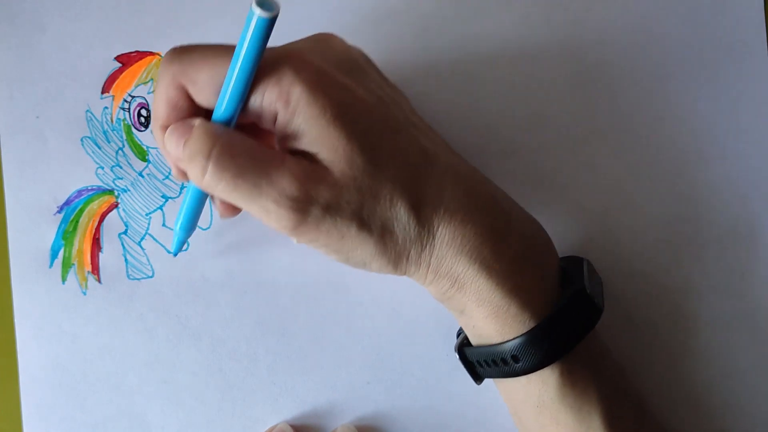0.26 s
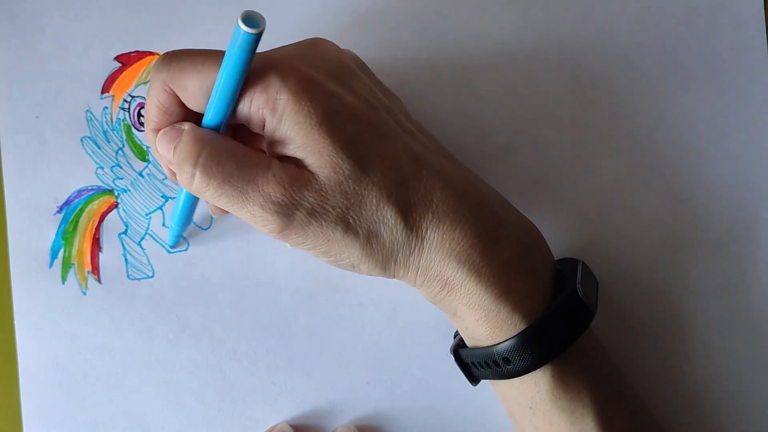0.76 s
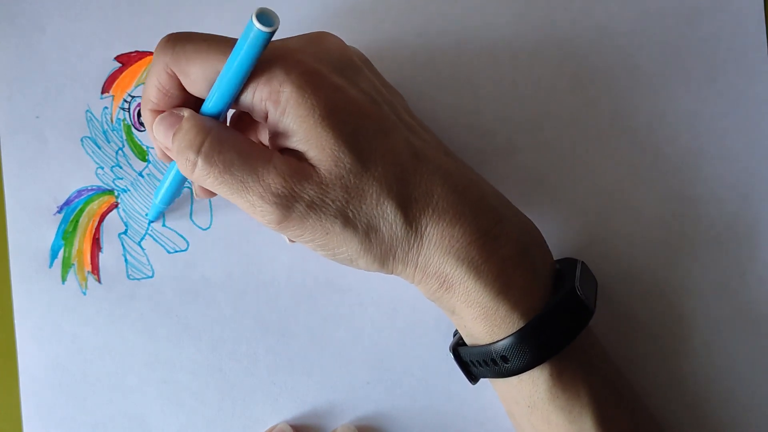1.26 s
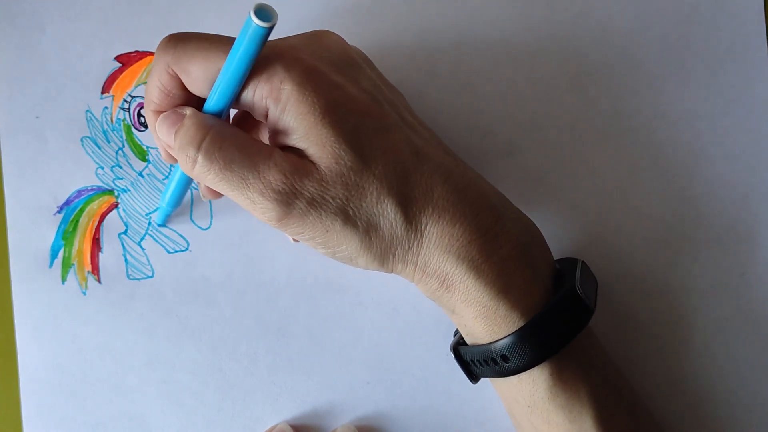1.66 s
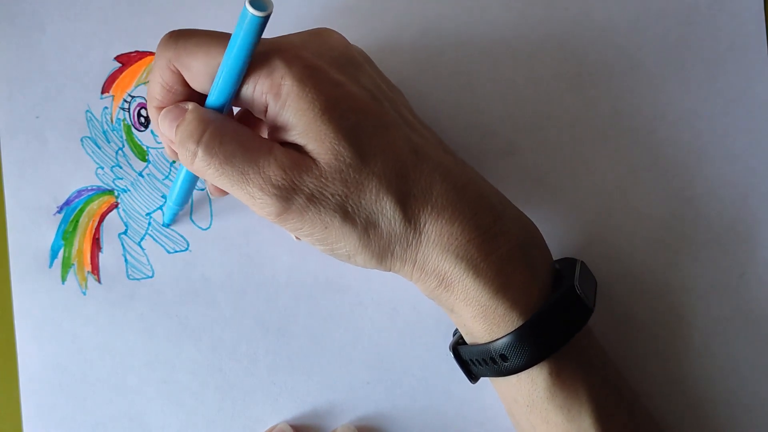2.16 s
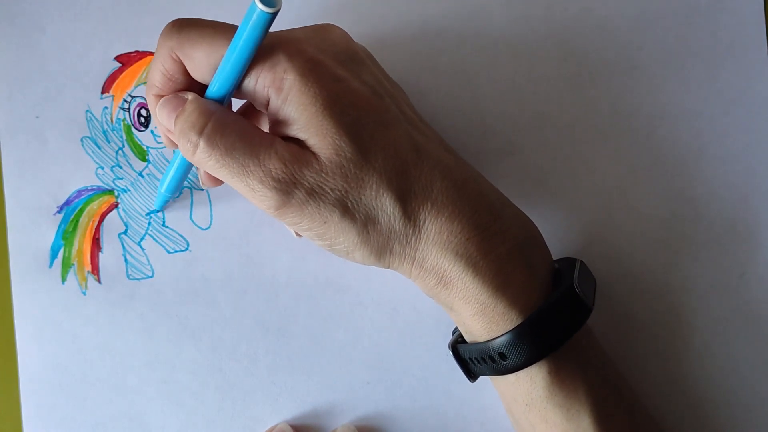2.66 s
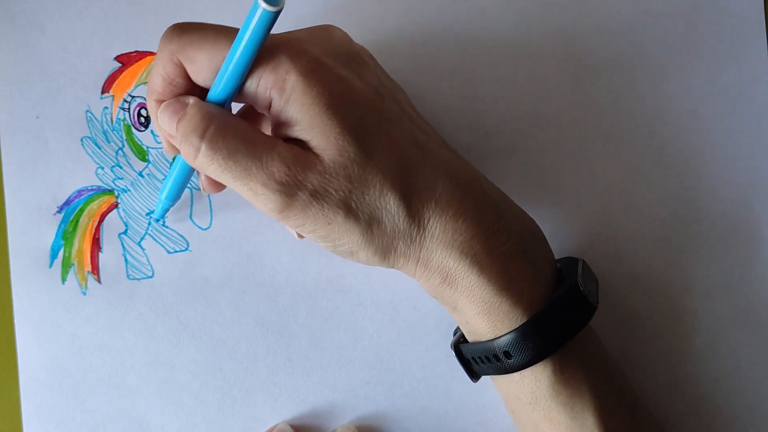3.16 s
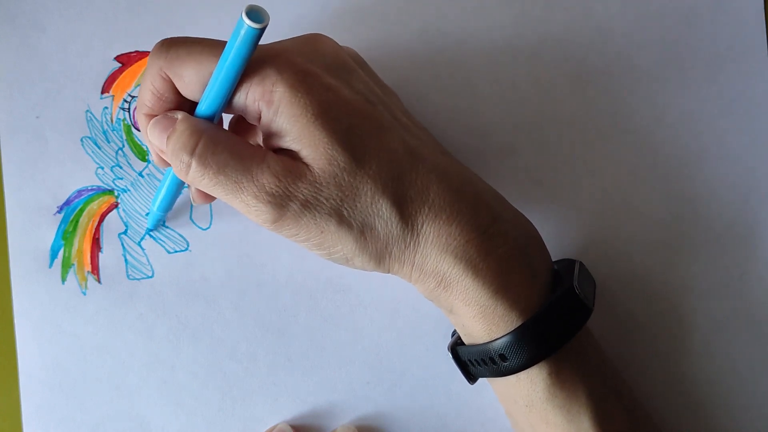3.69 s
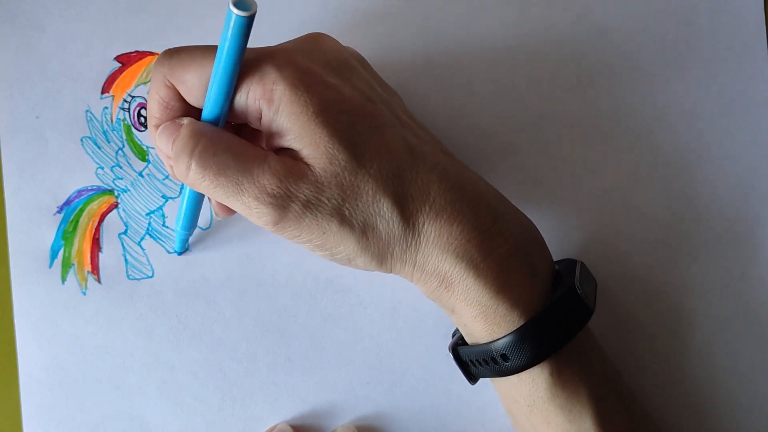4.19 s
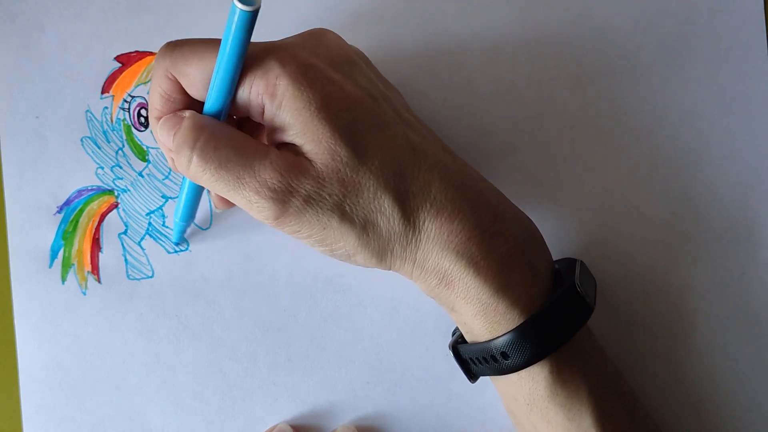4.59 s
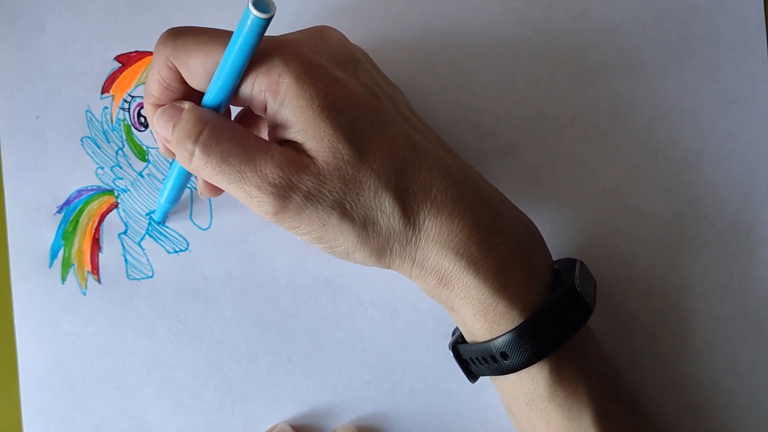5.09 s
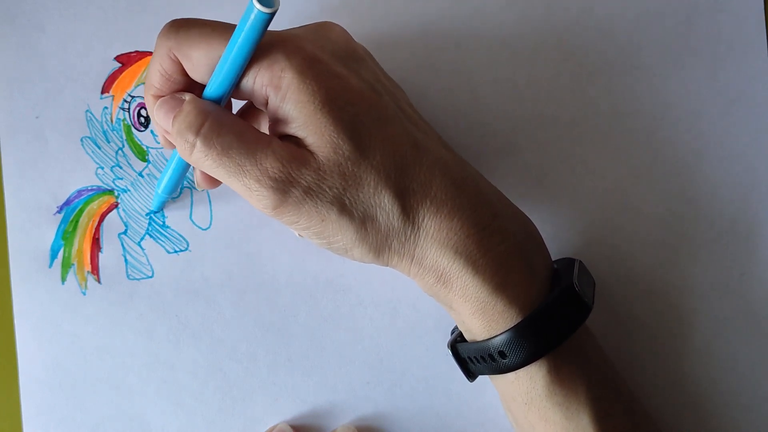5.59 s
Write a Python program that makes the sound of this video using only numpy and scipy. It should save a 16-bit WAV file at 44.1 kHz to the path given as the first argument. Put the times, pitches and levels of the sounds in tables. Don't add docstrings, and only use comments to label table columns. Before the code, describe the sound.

A felt-tip pen scratches short dry colouring strokes on paper in a quiet room, after a faint motor buzz and a hand slide.

```python
import sys
import numpy as np
from scipy import signal
from scipy.fft import rfft, irfft
from scipy.io import wavfile

SR = 44100
rng = np.random.default_rng(int(sys.argv[2]) if len(sys.argv) > 2 else 0)


def voltage_ratio(decibels):
    exponent = np.asarray(decibels, float) / 20
    return 10 ** exponent


def materialize(psi):
    bounded = np.clip(np.atleast_2d(psi).T, -1, 1)
    quanta = np.round(bounded * 32767).astype(np.int16)
    wavfile.write(sys.argv[1], SR, quanta)


N = 257544
T = np.arange(N) / SR
HZ = np.fft.rfftfreq(N, 1 / SR)


def evened(x):
    return x / np.sqrt(np.mean(x ** 2) + 1e-20)


def coloured(points):
    f, db = np.transpose(points)
    gain_db = np.interp(np.log(HZ + 1), np.log(f + 1), db)
    return evened(irfft(rfft(rng.standard_normal(N)) * voltage_ratio(gain_db), N))


def drift(hz):
    return evened(irfft(rfft(rng.standard_normal(N)) * np.exp(-(HZ / hz) ** 2), N))


def rung(x, modes):
    gain = 0
    for k, (f, width, db) in enumerate(modes):
        damping = 1j * HZ * width
        gain = gain + (-1) ** k * voltage_ratio(db) * damping / (f ** 2 - HZ ** 2 + damping)
    return irfft(rfft(x) * gain / np.sqrt(np.mean(abs(gain) ** 2)), N)


def felt_slips():
    slips_per_s, size_spread_db, grip_flutter_db = 10000, 2.8, 1.2
    size = voltage_ratio(size_spread_db * np.minimum(rng.exponential(1, N), 5))
    size *= rng.choice([-1., 1.], N)
    fires = rng.random(N) < slips_per_s / SR
    return evened(size * fires * voltage_ratio(grip_flutter_db * drift(170)))


def stroke_pressure():
    # (start [s], press-down [s], lift-off [s], barrel level [dB], desk share [dB])
    strokes = [(0.79, .03, 0.089, -64, -2), (1.085, 0.08, 0.056, -65.5, -1.5),
               (1.235, 0.022, .035, -75.5, -12), (1.39, 0.055, 0.07, -63, -1),
               (1.725, 0.06, 0.057, -63.5, -2), (2.185, 0.0078, 0.059, -59.5, -2),
               (2.41, 0.044, 0.027, -68.5, 2), (2.59, .05, .04, -77.5, 5), (2.8, .014, 0.044, -78, 2),
               (2.984, 0.013, 0.055, -73, 5), (3.6, 0.028, 0.056, -76, 6.5), (3.87, 0.036, 0.037, -73.5, 1),
               (4.18, 0.041, 0.072, -71, -4), (4.53, 0.055, 0.06, -71, 3), (4.864, 0.018, 0.1, -65, -2.5),
               (5.175, 0.043, 0.028, -68.5, 0.5), (5.49, 0.042, .03, -80, -5)]
    # (loose shell share [dB], nib tilt as tip share [dB])
    grips = [(-4.5, -2), (-8, 1), (-11, 2), (-11, -0.5), (-11, -1), (-13, -2), (-13, 1), (-4, -1), (-6, -4),
             (-3, 0.5), (-8, -2), (-10, -2), (-9, 0), (-12, -1), (-15, -3), (-8, -1), (-8, -1)]
    # (time [s], half length [s], level [dB])
    grazes = [
        (4.265, 0.024, -77),
        (4.326, 0.016, -74),
        (5.245, .012, -70),
        (5.52, .03, -83),
    ]
    land_db, land_curve, lift_db, lift_curve = -21, 2.8, -28, 1.85
    desk_follows = .7
    desk_gains_db, tip_gains_db = 1, 3
    tip_db, tip_lag_s = -1, 0.0034

    barrel, shell, desk, tip = np.zeros((4, N))
    for (start_s, down_s, lift_s, press_db, desk_db), (loose_db, tilt_db) in zip(strokes, grips):
        on = (T >= start_s) & (T < start_s + down_s + lift_s)
        past_s = T[on] - start_s - down_s
        under_db = land_db * np.clip(-past_s / down_s, 0, 1) ** land_curve
        under_db += lift_db * np.clip(past_s / lift_s, 0, 1) ** lift_curve
        along = np.where(past_s < 0, past_s / down_s, past_s / lift_s)
        edge = signal.windows.tukey(on.sum(), .1)
        barrel[on] += voltage_ratio(press_db + under_db) * edge
        shell[on] += voltage_ratio(press_db + under_db + loose_db) * edge
        desk[on] += voltage_ratio(press_db + desk_db + desk_follows * under_db + desk_gains_db * along) * edge
        tip[on] += voltage_ratio(press_db + under_db + tip_db + tilt_db + tip_gains_db * along) * edge
    tip = np.roll(tip, round(tip_lag_s * SR))
    for time_s, half_s, graze_db in grazes:
        tip += voltage_ratio(graze_db) * np.exp(-((T - time_s) / half_s) ** 2)
    return barrel, shell, desk, tip


def pen():
    # (frequency [Hz], width [Hz], level [dB])
    desk_modes = [(392, 123, 4), (1010, 200, -1.5), (1273, 100, 3.5), (1514, 205, 5), (1700, 225, 5),
                  (2000, 170, 4), (2476, 450, 0.5)]
    # (frequency [Hz], width [Hz], level [dB])
    barrel_modes = [(4404, 155, 0.5), (4770, 230, 6), (5030, 760, -2.5), (5590, 270, 4), (5950, 370, -4),
                    (3300, 710, -2), (3820, 190, -1.5)]
    # (frequency [Hz], width [Hz], level [dB])
    shell_modes = [(5130, 390, 0)]
    # (frequency [Hz], width [Hz], level [dB])
    tip_modes = [(6900, 130, -1), (7730, 240, -2.5), (8450, 400, -5), (9280, 250, -2.5), (9960, 330, -1.5),
                 (10500, 240, 1.5), (11200, 140, 1), (11600, 540, -4), (11830, 370, -4), (12130, 620, -0.5),
                 (12800, 320, -6), (13100, 450, -14), (14500, 530, -4), (15200, 280, -14)]
    # (frequency [Hz], width [Hz], level [dB])
    sheet_modes = [
        (3500, 3700, 0),
        (12700, 6000, -3),
    ]
    sheet_db = -8

    slips = felt_slips()
    barrel, shell, desk, tip = stroke_pressure()
    out = voltage_ratio(sheet_db) * rung(slips * np.sqrt(barrel * tip), sheet_modes)
    out += rung(slips * desk, desk_modes)
    out += rung(slips * barrel, barrel_modes)
    out += rung(slips * shell, shell_modes)
    return out + rung(slips * tip, tip_modes)


def tap():
    time_s, level_db, half_s = .264, -50, .00006
    u = (T - time_s) / half_s
    return voltage_ratio(level_db) * 2 * u * np.exp(-u ** 2)


def squeak():
    start_s, end_s, pitch_hz, level_db = 3.567, 3.601, 9110, -74.5
    shape = np.clip((T - start_s) / .004, 0, 1) * np.clip((end_s - T) / .0007, 0, 1)
    turns = np.cumsum(pitch_hz + 12 * drift(60)) / SR
    return voltage_ratio(level_db + 1.7 * drift(120)) * shape * np.sqrt(2) * np.sin(2 * np.pi * turns)


def motor():
    # (start [s], knock rate at start [Hz], knock rate at end [Hz], level [dB])
    motor_steps = [
        (0, 376.4, 368.5, -73),
        (.058, 349.6, 358.5, -72.5),
        (.125, 360.4, 352, -72),
        (.17, 328.4, 324, -74),
        (.275, 309.7, 295.8, -74.5),
        (.646, 351.5, 355, -74),
        (0.859, 342.6, 340, -73.5),
        (1.008, 313, 316, -74),
        (1.075, 310.4, 308, -75),
    ]
    # (multiple of the ring [1], half width [Hz], level [dB])
    ring_modes = [
        (1, 560, 0),
        (2, 480, -1.5),
        (2.22, 500, -9),
        (2.93, 350, -5),
        (3.24, 450, -4),
    ]
    stop_s, fade_s, fade_db = 1.3, 0.054, -16
    seat_s = .17
    free_hz, free_spread = 5230, 1.5
    seated_hz, seated_spread = 4560, 1.1

    t = T[T < stop_s]
    start_s, from_hz, to_hz, step_db = np.transpose(motor_steps)
    i = np.clip(np.searchsorted(start_s, t, "right") - 1, 0, None)
    done = (t - start_s[i]) / np.diff(np.append(start_s, stop_s))[i]
    knock_hz = from_hz[i] + (to_hz - from_hz)[i] * done
    level_db = step_db[i] + fade_db * np.clip(1 - (stop_s - t) / fade_s, 0, 1)
    ring_hz = np.where(t < seat_s, free_hz, seated_hz)
    spread = np.where(t < seat_s, free_spread, seated_spread)
    turns = np.cumsum(knock_hz * (1 + .0055 * drift(30)[:len(t)])) / SR
    buzz = np.zeros(len(t))
    for k in range(10, 52):
        near = 0
        for multiple, half_hz, mode_db in ring_modes:
            off = (k * knock_hz - multiple * ring_hz) / (half_hz * spread)
            near = near + voltage_ratio(mode_db) * np.exp(-.5 * off ** 2)
        buzz += near * np.cos(2 * np.pi * k * turns)
    buzz = evened(buzz) * (1 + .5 * rng.standard_normal(len(t)))
    return np.pad(voltage_ratio(level_db) * buzz, (0, N - len(t)))


def hand():
    # (time [s], level [dB])
    slide_levels = [
        (0, -66.5),
        (.15, -94),
        (.25, -79),
        (.35, -67.5),
        (.42, -95),
        (.6, -76),
        (1.201, -88.5),
        (1.35, -100),
    ]
    # (frequency [Hz], density [dB per Hz])
    skin_spectrum = [(800, 2.5), (2500, -3), (4000, 0), (6600, -4), (7700, -12), (12000, -8), (16000, -5)]
    time_s, slide_db = np.transpose(slide_levels)
    level_db = np.interp(T, time_s, slide_db, right=-140) + 0.77 * drift(30)
    return voltage_ratio(level_db) * coloured(skin_spectrum)


def swells(rows, rest_db, width_s):
    power = voltage_ratio(rest_db) ** 2
    for time_s, bump_db in rows:
        power = power + voltage_ratio(bump_db) ** 2 * np.exp(-((T - time_s) / width_s) ** 2)
    return 10 * np.log10(power)


def wavering(hz, waver_hz, db):
    turns = np.cumsum(hz + waver_hz * drift(3.85)) / SR
    return voltage_ratio(db) * np.sqrt(2) * np.sin(2 * np.pi * turns)


def drones():
    # (time [s], level [dB])
    thrum_swells = [(.15, -65), (.6, -61), (.97, -59), (1.3, -56.5), (1.66, -53.5), (2.02, -57),
                    (2.45, -57.5), (2.8, -59.5), (3.08, -64), (3.53, -51), (3.89, -63), (4.25, -54),
                    (4.66, -61), (4.96, -53), (5.33, -56), (5.8, -52.5)]
    mains_hz = 50.3
    out = wavering(39.5, 1.2, swells(thrum_swells, rest_db=-70.5, width_s=0.1))
    out += wavering(mains_hz, .6, -66 + 4.5 * drift(2.5))
    out += wavering(2 * mains_hz, 1.2, -75)
    return out + wavering(1568.5, 1.5, -88.5 + 1.5 * drift(3))


def rumble():
    # (time [s], level [dB])
    sway_swells = [(.33, -43), (.63, -47), (.91, -48), (1.4, -49), (2.31, -48), (2.54, -49), (2.75, -48),
                   (3.03, -52), (3.75, -51), (4.67, -50), (5.32, -53)]
    sway_spectrum = [(0, -16.5), (2, 7.0), (5, -8.5), (12, 0.0), (25, -29.5), (60, -63.5)]
    air_spectrum = [(8, -29.5), (20, 3.5), (45, -3), (60, -14), (120, -51)]
    sway = voltage_ratio(swells(sway_swells, rest_db=-55, width_s=.09)) * coloured(sway_spectrum)
    return sway + voltage_ratio(-60) * coloured(air_spectrum)


def hiss():
    # (frequency [Hz], density [dB per Hz])
    hiss_spectrum = [(35, -20), (60, -7), (80, -8), (129, -12.5), (226, -17), (673, -24), (1380, -28.5),
                     (2500, -31.5), (4630, -34), (8000, -37), (11000, -37.5), (16000, -36)]
    return voltage_ratio(-63.5 + 0.16 * drift(3.2)) * coloured(hiss_spectrum)


def reflected(near):
    echoes = np.zeros(1500)
    echoes[rng.integers(40, 1500, size=60)] = rng.choice([-1., 1.], size=60)
    echoes *= voltage_ratio(-60 * np.arange(1500) / SR / 0.064)
    wet = signal.oaconvolve(near, echoes / np.linalg.norm(echoes))[:N]
    return near + voltage_ratio(-12) * wet


def scene():
    near = pen() + tap() + squeak() + hand()
    return (reflected(near) + motor() + drones() + rumble() + hiss())[None]


def roll_off(x):
    return signal.sosfilt(signal.butter(12, 15670, fs=SR, output="sos"), x)


def record(dry):
    return roll_off(dry)


dry = scene()
out = record(dry)
materialize(out)
```